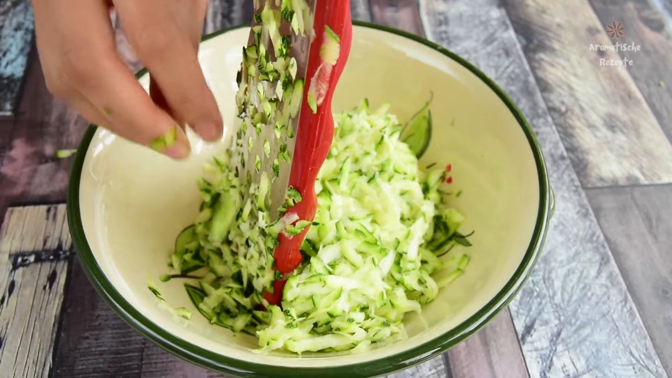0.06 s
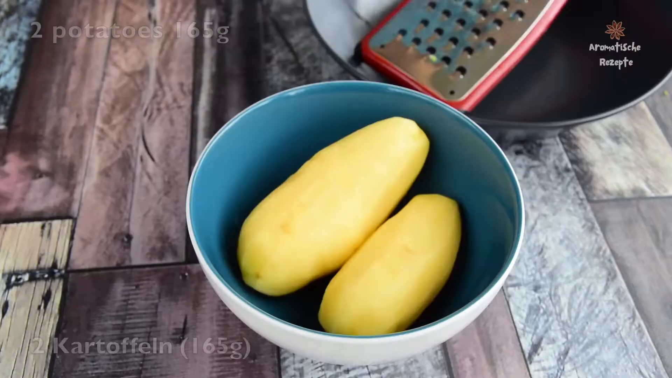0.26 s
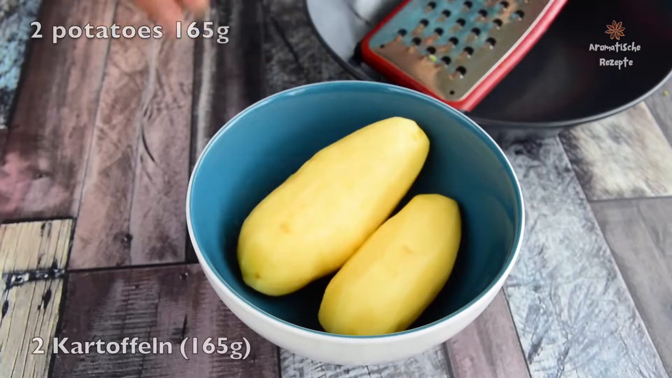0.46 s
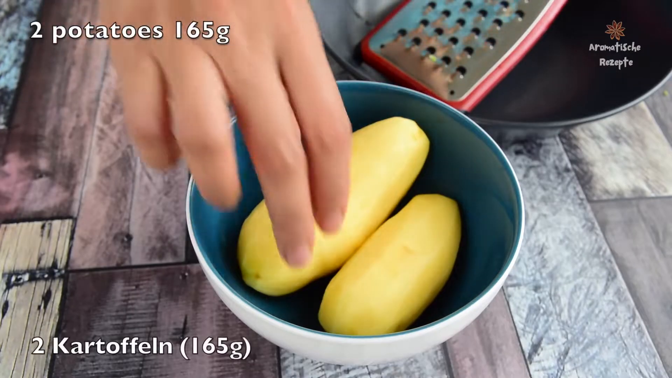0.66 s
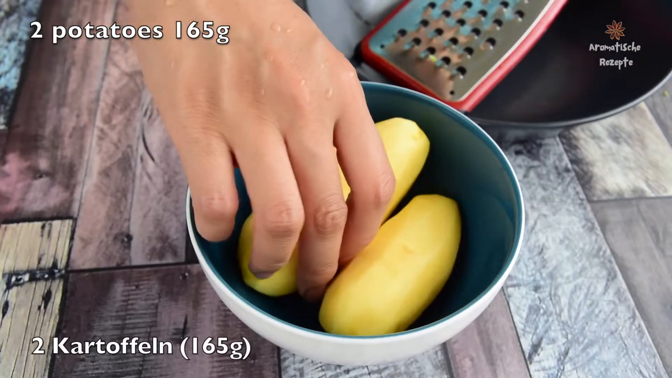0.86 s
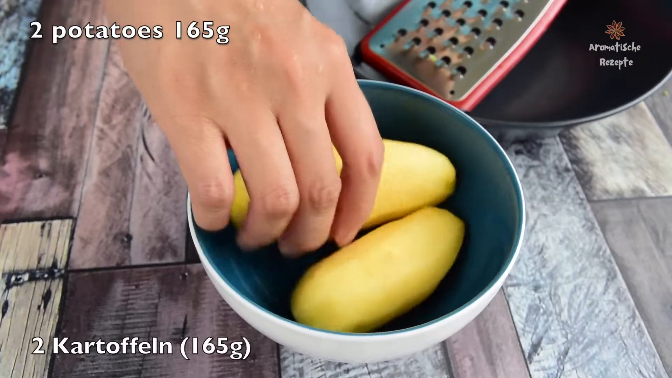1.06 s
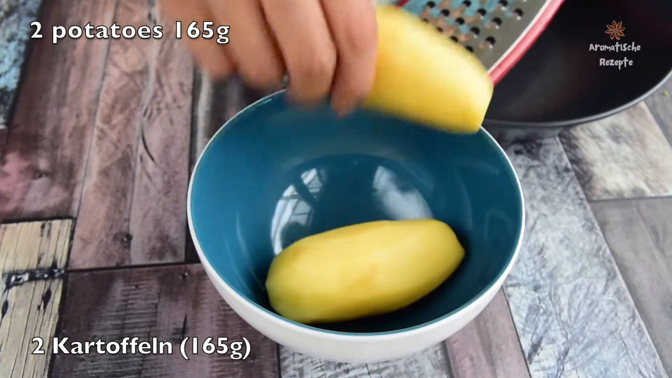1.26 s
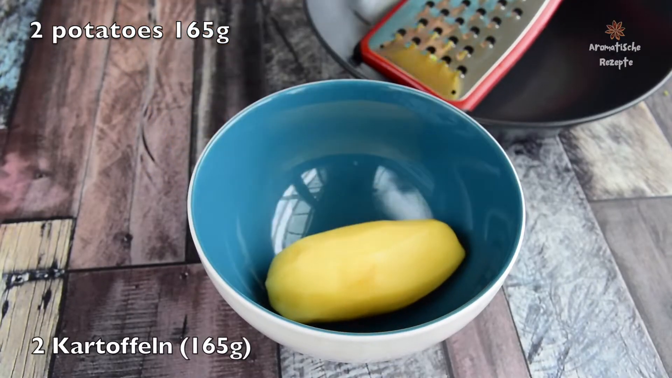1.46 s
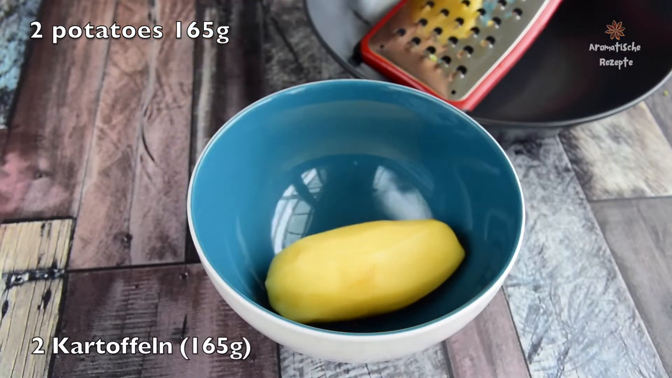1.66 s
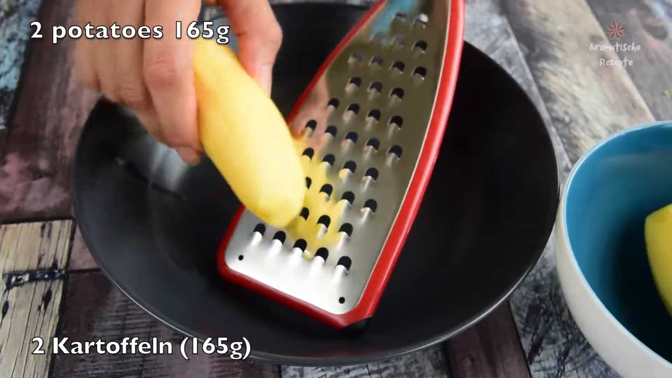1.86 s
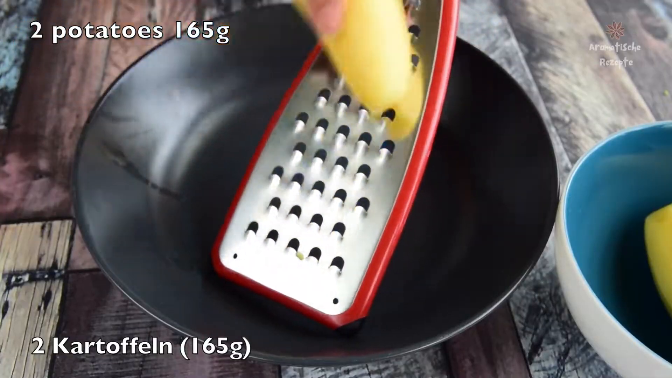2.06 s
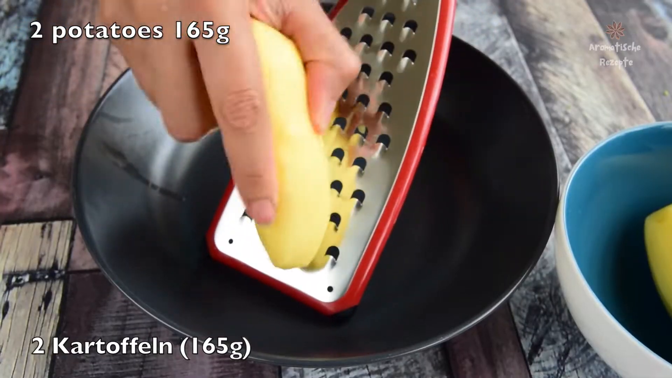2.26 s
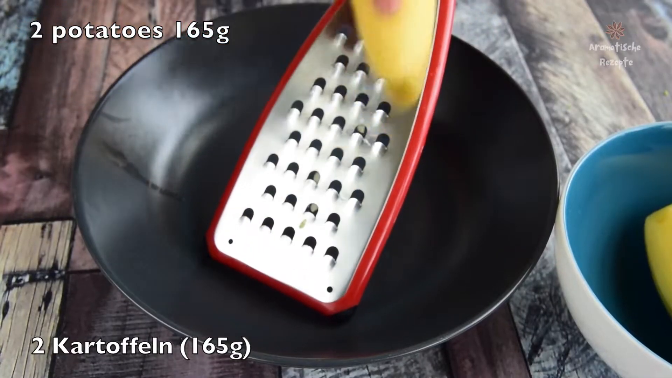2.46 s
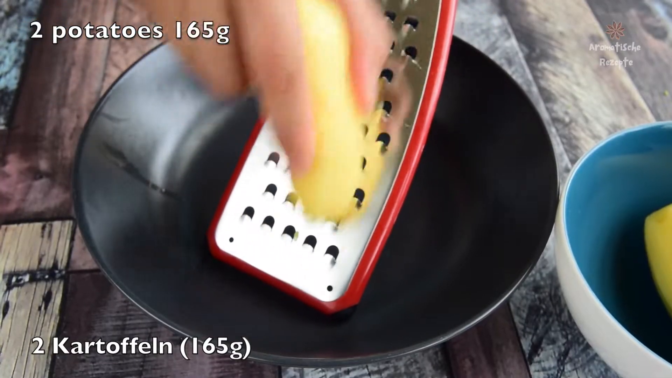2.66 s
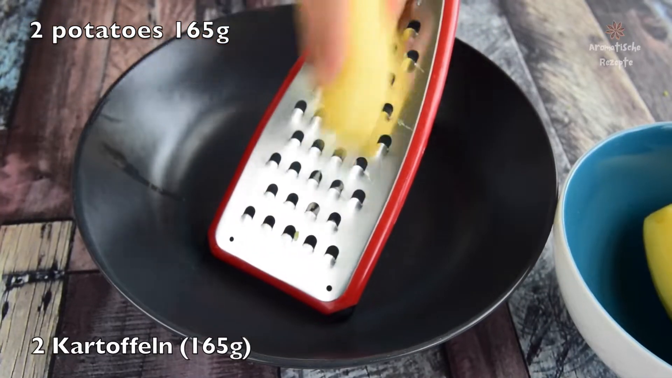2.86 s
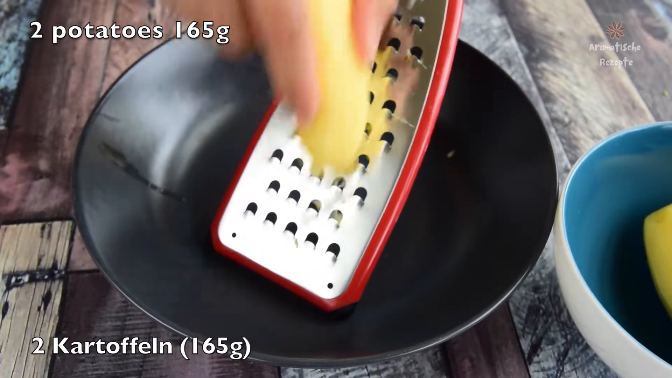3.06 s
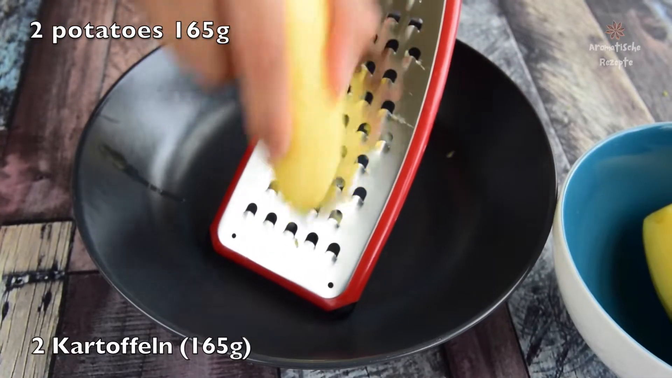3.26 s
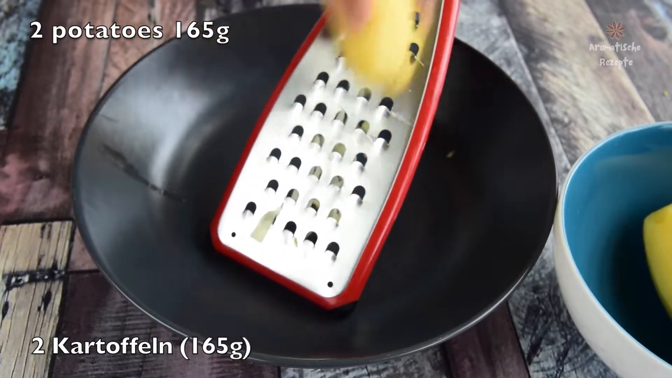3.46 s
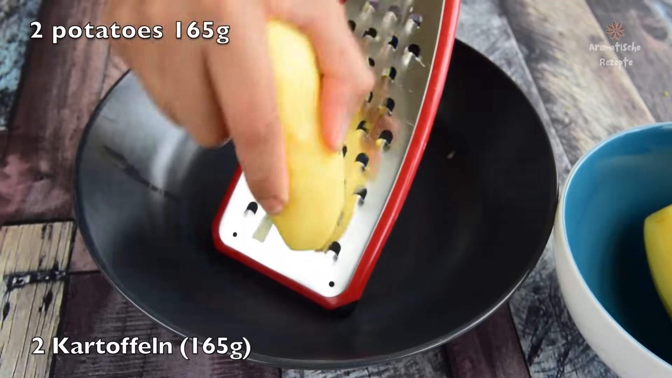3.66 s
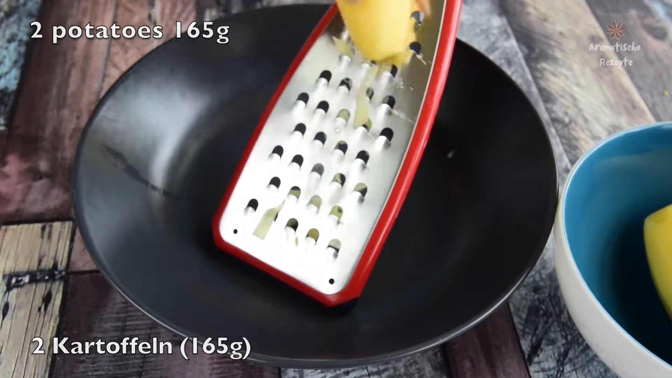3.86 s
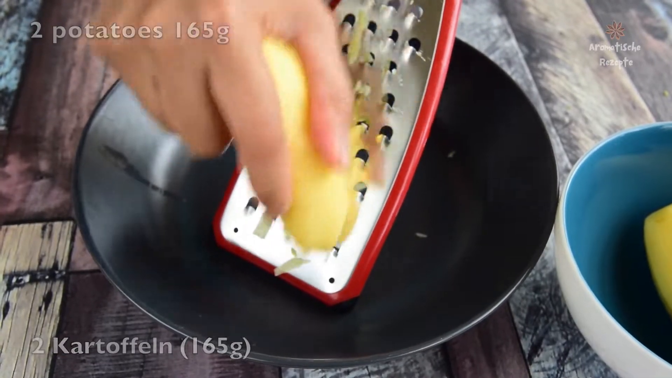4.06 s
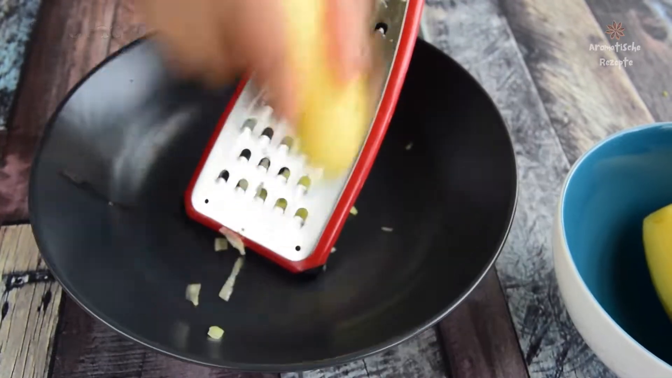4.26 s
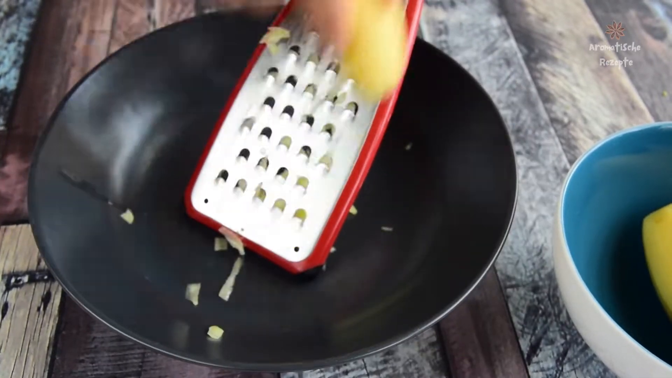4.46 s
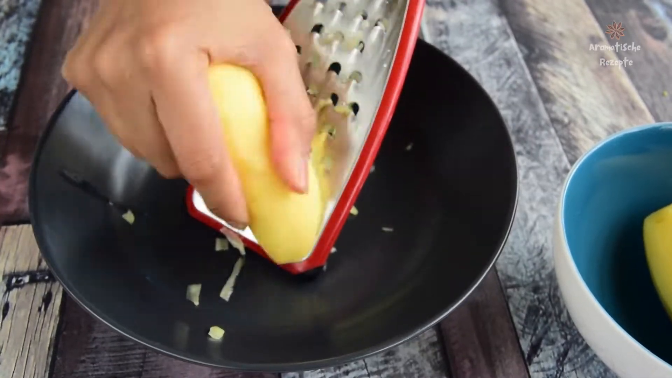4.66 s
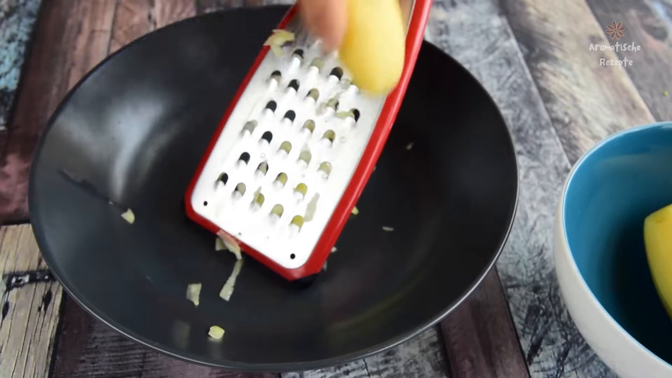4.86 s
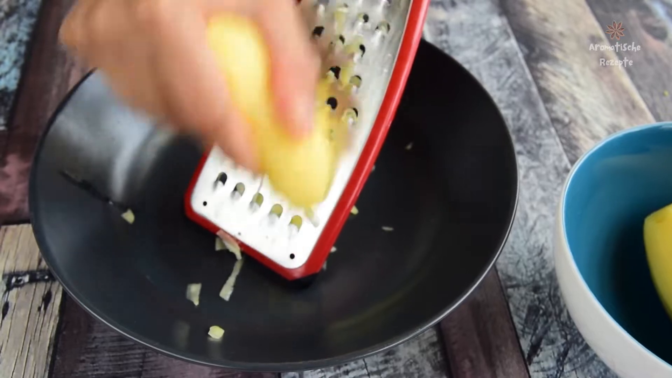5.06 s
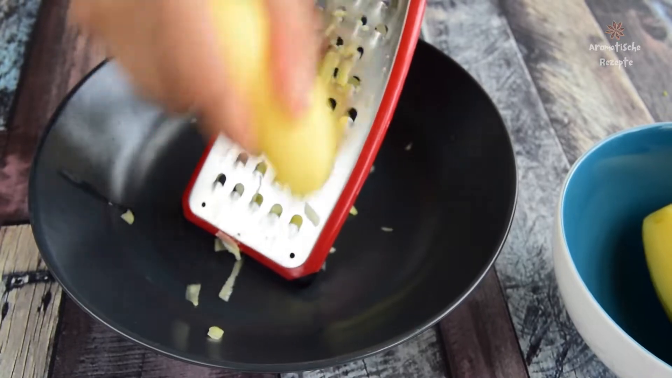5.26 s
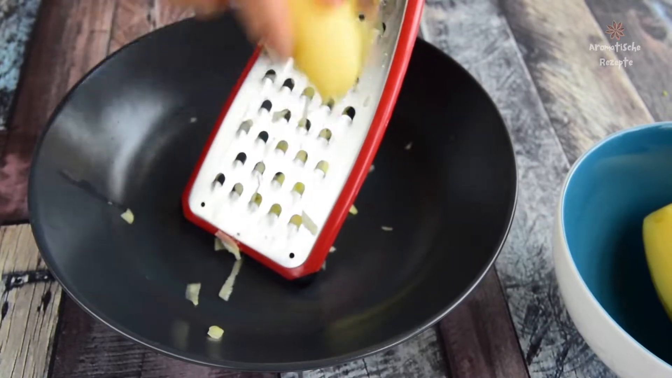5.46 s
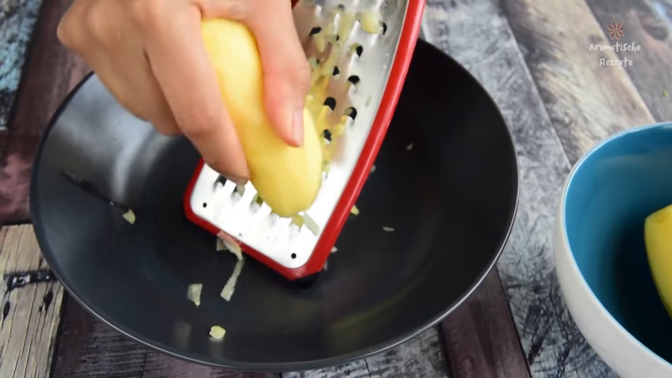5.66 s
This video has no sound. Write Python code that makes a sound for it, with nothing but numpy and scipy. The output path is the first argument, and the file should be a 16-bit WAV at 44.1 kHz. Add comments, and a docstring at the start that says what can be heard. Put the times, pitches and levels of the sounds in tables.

```python
"""Room air sinks away and swells back, then a potato bumps, rubs and squeaks in a ceramic bowl that clinks
on a plate. After a second fade it is rubbed over a flat steel grater, about three pushes a second.
Pushes tear the flesh and pulls skid back: showers of tiny ruptures drive tooth and sheet resonances.
Struck frame, crockery and table are decaying sines; shaped noise makes the sway, the walls and the air."""
import sys
import numpy as np
from scipy import signal
from scipy.fft import rfft, irfft
from scipy.io import wavfile
from scipy.ndimage import map_coordinates

SR = 44100
rng = np.random.default_rng(int(sys.argv[2]) if len(sys.argv) > 2 else 0)


def to_wav(s):
    """Save 16-bit WAV."""
    ch = np.atleast_2d(s).T  # columns
    pcm = np.round(np.clip(ch, -1, 1) * 32767)  # PCM
    wavfile.write(sys.argv[1], SR, pcm.astype(np.int16))


N = 251811
T = np.arange(N) / SR  # time in seconds

# Levels in the tables are relative: the mix and the fader scale them further.
# cutting strokes: start_s, length_s, level_db
PUSH_STROKES = [(2.088, 0.19, -29), (2.44, 0.18, -24.5), (2.802, .173, -22.5), (3.158, 0.17, -24),
                (3.497, 0.18, -22), (3.864, 0.16, -19.5), (4.204, .14, -20), (4.5, .17, -20.5),
                (4.843, 0.17, -21.5), (5.17, 0.15, -20.5), (5.489, .158, -21.5)]
# return strokes: start_s, length_s, level_db
PULL_STROKES = [(1.97, 0.14, -50.5), (2.25, 0.19, -36.5), (2.59, 0.19, -33), (2.97, 0.19, -32.5),
                (3.325, 0.18, -31), (3.676, 0.19, -31.5), (4.016, 0.19, -29), (4.35, 0.15, -29.5),
                (4.66, 0.084, -34.5), (4.985, 0.11, -36.5), (5.322, 0.17, -32), (5.675, 0.053, -33.5)]
# the potato catches on a tooth and jolts the grater: time_s, sheet_ring_db, frame_knock_db
TOOTH_CATCHES = [(1.991, -37, -55), (2.016, -36, -53), (2.064, -40.5, -63), (2.316, -26, -34),
                 (2.4, -22.5, -55), (2.713, -40, -31.5), (2.747, -22.5, -29.5), (3.07, -22.5, -46),
                 (3.106, -19, -42), (3.419, -28, -30), (3.458, -16.5, -43), (3.727, -21.5, -28.5),
                 (3.826, -20.5, -49), (4.379, -24, -34), (5.1, -31, -65)]
# the bowl bumps the table: time_s, level_db
BOWL_THUMPS = [(0.965, -26), (1.371, -41)]
# resonances of the steel sheet, damped by the potato: pitch_hz, width_hz, level_db
SHEET_MODES = [(800, 30, -15), (1220, 58, -10), (1567, 68, -3), (2213, 94, -8.5), (2605, 173, -2.5),
               (3195, 22, -12), (3478, 370, 1), (4270, 37, 4), (4600, 620, -4), (5800, 300, -9),
               (8090, 390, 0), (9880, 380, -1.5), (11950, 520, -2.5)]
# plastic frame on the plate: pitch_hz, level_db, t60_s
FRAME_MODES = [(596, 7.5, 0.022), (758, 6.5, 0.047), (1340, 2.5, 0.094), (1643, 9, 0.03)]
# spectrum of skidding flesh: pitch_hz, level_db (per Hz)
SKID_COLOUR = [(400, -15.5), (1500, 0.5), (3400, 7), (7000, 1.5), (10000, 3.5), (13000, -1), (16000, -31)]


def pushes(sheet_db=-4.0, flesh_db=-1.5, bite_db=-15.0, clog_db_per_s=0.54):
    """Cutting strokes: flesh crackles on the teeth and rings the sheet; a deep bite adds a lower crunch."""
    # spectra of tearing flesh and of the deep bite: pitch_hz, level_db (per Hz)
    tear_colour = [(400, -52), (1200, -33.5), (2300, -1), (3500, -3), (5500, -4), (7200, -4), (8200, -1.5),
                   (12000, -1.5), (14000, -8.5), (16000, -14)]
    bite_colour = [(150, -36), (280, 7.5), (430, -11), (650, 0), (1000, -1.5), (1400, 7.5), (2200, 5),
                   (5000, -16.5)]
    force = teeth(rate=400, spread_db=3, release_s=.004, steady=.55)
    tearing = crackle(force, rate=16000, spread_db=2.5)
    tearing = cutters(tearing, rate=85, patchy_db=4.7, width_hz=200)
    flesh = unit(through(tearing, colour(tear_colour)))
    crunch = unit(through(tearing, colour(bite_colour)))
    steel = damped_sheet(crackle(force, rate=7000, spread_db=8), rate=37, patchy_db=-0.5)
    steel = steel * undb(-clog_db_per_s * grated_s())  # shreds gather and damp the sheet
    mix = undb(flesh_db) * flesh + undb(sheet_db) * steel + undb(bite_db) * crunch
    return effort(PUSH_STROKES, skew=0.9, power=1.3) * mix  # pointed, peaking early


def pulls(sheet_db=-3, flesh_db=-3, frame_db=-17, rocking_db=6):
    """Return strokes: flesh skids over the backs of the teeth, the sheet rings patchily, the frame chatters."""
    force = teeth(rate=170, spread_db=3, release_s=.005, steady=.6)
    skidding = crackle(force, rate=8000, spread_db=3)
    skidding = cutters(skidding, rate=55, patchy_db=5, width_hz=170)
    flesh = unit(through(skidding, colour(SKID_COLOUR)))
    steel = damped_sheet(crackle(force, rate=4300, spread_db=4.5), rate=32, patchy_db=7.0)
    chatter = unit(through(crackle(force, rate=540, spread_db=-0.5), ring(FRAME_MODES)))
    chatter = chatter * undb(rocking_db * rocking())
    mix = undb(flesh_db) * flesh + undb(sheet_db) * steel + undb(frame_db) * chatter
    return effort(PULL_STROKES, skew=1.46, power=0.97) * mix  # round, peaking late


def catches(sheet_db=21.0, snap_db=15.0, frame_db=2):
    """A caught tooth tears free with a short rasp, and the frame knocks on the plate."""
    release = burst(t60=0.026) * np.minimum(T[:SR] / .004, 1)  # 4 ms attack
    rasp = through(blows([(s, db) for s, db, knock in TOOTH_CATCHES]), release)
    knocks = through(blows([(s, knock) for s, db, knock in TOOTH_CATCHES]), ring(FRAME_MODES))
    steel = undb(sheet_db) * through(rasp, sheet())
    snap = undb(snap_db) * through(rasp, colour(SKID_COLOUR))
    return steel + snap + undb(frame_db) * knocks


def singing(skew=1.5, power=1.3, patchy_db=4):
    """Barely damped by a light touch, the sheet rings on fitfully as grating begins."""
    # the potato first rests lightly: start_s, length_s, level_db
    light_touch = (2.03, .19, -40)
    # barely damped sheet: pitch_hz, level_db, t60_s
    free_modes = [(1640, -27, 0.18), (3160, -2, 0.035), (4890, 3, 0.041)]
    tone = through(crackle(1, rate=680, spread_db=2), ring(free_modes))
    tone = unit(tone * undb(patchy_db * wander(45)))
    return effort([light_touch], skew, power) * tone


def teeth(rate, spread_db, release_s, steady):
    """Force on the teeth: each one bites suddenly and lets go, over a steady drag."""
    force = through(snaps(rate, spread_db), np.exp(-T[:SR // 10] / release_s))
    return unit(np.sqrt(np.abs(force / force.mean() + steady)))


def crackle(force, rate, spread_db):
    """Cells of the flesh burst in showers, as hard as the teeth pull."""
    return unit(force * snaps(rate, spread_db) * rng.choice([-1, 1], N))


def snaps(rate, spread_db):
    """Tiny ruptures at random moments, of uneven size; rate is per second."""
    sizes = undb(spread_db * np.clip(rng.standard_normal(N), -2, 2))
    return (rng.random(N) < rate / SR) * sizes


def cutters(x, rate, patchy_db, width_hz, count=44):
    """Every tooth has its own pitch, and its level wanders as it works in the flesh."""
    pitches = np.linspace(np.sqrt(450), np.sqrt(15800), count) ** 2
    pitches = pitches * rng.uniform(.98, 1.02, count)
    widths = width_hz * np.sqrt(pitches / pitches.mean())  # higher ones die sooner
    total = np.zeros(N)
    for k, hz in enumerate(pitches):
        total += (-1) ** k * undb(patchy_db * wander(rate)) * resonate(x, hz, widths[k])
    return unit(total)


def damped_sheet(x, rate, patchy_db, drift_s=.003):
    """The travelling potato covers and frees each mode of the sheet in turn, and its load detunes them."""
    modes = np.zeros(N)
    for hz, width, db in SHEET_MODES:
        modes += undb(db + patchy_db * wander(rate)) * resonate(x, hz, width)
    drifting_s = T + drift_s * wander(5)  # a moving delay bends the pitch
    return unit(map_coordinates(modes, [drifting_s * SR], order=3))


def sheet():
    """Response of the steel sheet, unit energy; wide resonances die soonest."""
    t = T[:SR // 10]
    response = np.zeros(len(t))
    for hz, width, db in SHEET_MODES:
        response += undb(db) * width * np.cos(2 * np.pi * hz * t) * np.exp(-np.pi * width * t)
    return response / np.linalg.norm(response)


def stroke(start, length, skew, power):
    """One arch of the hand's speed, up and back to a stop; skew over 1 peaks late, high power is pointed."""
    along = np.clip((T - start) / length, 0, 1)
    return np.abs(np.sin(np.pi * along ** skew)) ** power


def effort(rows, skew, power):
    """Strength over time of a series of (start_s, length_s, level_db) strokes."""
    return sum(undb(db) * stroke(start, length, skew, power) for start, length, db in rows)


def grated_s(begin_s=2.36):
    """Time spent grating so far."""
    return np.maximum(T - begin_s, 0)


def rocking(wear_s=0.57):
    """How much the potato rocks on the teeth: 1 while round, decaying towards 0 as it wears flat."""
    return np.exp(-grated_s() / wear_s)


def bowl(rub_db=-2, tap_db=-33, crack_db=8, clink_db=4):
    """The potato taps and rubs the bowl; let go, the bowl clinks against the plate."""
    # the potato slides along the bowl: time_s, level_db
    slide = [(0.72, -83), (0.83, -59), (0.92, -80), (1.0, -63), (1.1, -68.5), (1.27, -63.5), (1.35, -71)]
    # the bowl knocks against the plate: time_s, level_db
    clinks = [(1.3703, -15.5), (1.3738, -29.5)]
    # bowl under the fingers, then dull tap of the potato in it: pitch_hz, level_db, t60_s
    bowl_modes = [(1092, 0.5, 0.24), (2810, 2, 0.078)]
    tap_modes = [(268, 9.5, 0.0083), (1160, -2, .09), (1690, 6.5, 0.047)]
    # bowl and plate together, with a close pair that beats: pitch_hz, level_db, t60_s
    crockery_modes = [(400, -17.5, 0.072), (740, -1, 0.085), (907, -3, 0.088), (1174, -21.5, 0.27),
                      (1297, -3.5, 0.14), (1596, -1, 0.05), (2053, 1, 0.07), (2016, -28.5, 0.7),
                      (2190, -8.5, 0.041), (2410, -2, 0.11), (2842, 2.5, 0.06), (2835, -9, .27),
                      (2850, -9, .27), (2845, -14, 0.04), (3340, -22, .04), (3730, -20.5, 0.079),
                      (3830, -7.5, 0.081), (3770, -30.5, 0.53), (5000, -29, 0.19), (6330, -26.5, 0.099)]
    rub = curve(slide) * unit(through(rng.standard_normal(N), ring(bowl_modes)))
    tap = through(blows([(BOWL_THUMPS[0][0], tap_db)]), ring(tap_modes))
    contact = blows(clinks)
    clink = through(contact, ring(crockery_modes))
    crack_colour = colour([(150, -33), (800, 2.5), (2600, -5), (4500, -14.0), (8000, -29.5), (15000, -42)])
    crack = through(through(contact, burst(t60=0.043)), crack_colour)
    return undb(rub_db) * rub + tap + undb(clink_db) * clink + undb(crack_db) * crack


def squeak(start_hz=1100, end_hz=1550, rough=0.23):
    """The wet potato slips on the glaze with a faint, rough, rising squeak."""
    hz = np.interp(T, [1.0, 1.05], [start_hz, end_hz]) * (1 + rough * wander(900))
    level = curve([(0.99, -60), (1.025, -54.5), (1.055, -62.5)])
    return level * np.sin(2 * np.pi * np.cumsum(hz) / SR)


def table(shake_db=1, sway_db=-7, jolt_db=9):
    """The table top booms under blows and jolts; it rumbles and sways under the juddering grater."""
    # table top: pitch_hz, level_db, t60_s
    table_modes = [(65.5, -7.5, 1), (98, 2.5, 0.076), (132, 0, 0.17), (177.8, -5, 0.19), (298.7, -9, 0.052)]
    top, shaking = ring(table_modes), shake()
    judder = through(shaking * crackle(1, rate=540, spread_db=4), top / np.linalg.norm(top))
    sway_colour = colour([(15, 18), (60, 11), (170, -17), (260, -36), (900, -26)])
    sway = shaking * through(rng.standard_normal(N), sway_colour)
    knocks = blows([(s, knock) for s, db, knock in TOOTH_CATCHES])
    jolts = undb(jolt_db) * rocking() * knocks
    booms = through(blows(BOWL_THUMPS) + jolts, top)
    return undb(shake_db) * judder + undb(sway_db) * sway + booms


def shake(push_db=-19, pull_db=-15, rocking_db=12.5, lean_db_per_s=0.3, settle_s=0.0051):
    """Every stroke shakes the table: pushes more as the hand leans harder, pulls most while the potato rocks."""
    shape = dict(skew=1.0, power=0.97)
    pushing = undb(push_db + lean_db_per_s * grated_s()) * effort(PUSH_STROKES, **shape)
    pulling = undb(pull_db + rocking_db * rocking()) * effort(PULL_STROKES, **shape)
    settling = np.exp(-T[:SR // 2] / settle_s)
    return through(pushing + pulling, settling / settling.sum())


def kitchen(x, wet_db=-17, t60=0.54, gap_s=0.008):
    """Walls return a soft, duller tail after a short gap."""
    tail = burst(t60) * np.clip(T[:SR] / gap_s - 1, 0, 1)
    walls = colour([(100, 16.0), (3000, 2.5), (7000, 5.0), (15000, -17.0)])
    return x + undb(wet_db) * through(through(x, tail), walls)


def air(air_db=-55):
    """Steady rumble and fainter hiss from shaped noise, with a small difference between the channels."""
    # spectrum of the room air: pitch_hz, level_db (per Hz)
    air_colour = [(15, -37), (25, -11.5), (64, 1), (82, -4.5), (96, -7), (173, -10.5), (552, -16.5),
                  (614, -17), (741, -17), (1660, -21), (2120, -22.5), (15500, -25.5)]
    # difference between the channels relative to their sum: pitch_hz, level_db
    air_width = [(60, -26.5), (500, -16.5), (2000, -27.5), (8000, -18.5)]
    hz, width_db = np.transpose(air_width)
    mid, side = (through(rng.standard_normal(N), colour(air_colour)) for _ in range(2))
    width = undb(np.interp(np.arange(N // 2 + 1) * SR / N, hz, width_db))
    side = irfft(rfft(side) * width, N)
    return undb(air_db) * np.array([mid + side, mid - side])


def fader(opening_db=5.5, faded_db=-30.5, cut_s=.016, fade_power=4.65):
    """The volume drops almost at once, then swells back, slowly at first, over a constant low floor."""
    # volume fades: cut_start_s, fully_back_s, level_afterwards_db (before the floor is added)
    fades = [(0.204, 0.7, 6), (1.764, 1.983, 0)]
    gain = undb(opening_db)
    for cut, back, db in fades:
        closing = np.clip(1 - (T - cut) / cut_s, 0, 1) ** 2
        opening = np.clip((T - cut) / (back - cut), 0, 1) ** fade_power
        gain = gain * closing + undb(db) * opening
    return gain + undb(faded_db)


def undb(db):
    """Decibels to gain."""
    return 10 ** (np.asarray(db) / 20)


def unit(x):
    """Scale to rms 1."""
    return x / np.sqrt(np.mean(x ** 2))


def curve(rows):
    """Gain over time from (time_s, level_db) rows, closing within a few ms outside them."""
    s, db = np.transpose(rows)
    outside = np.maximum(np.maximum(s[0] - T, T - s[-1]), 0)
    return undb(np.interp(T, s, db)) * np.exp(-outside / 0.0025)


def wander(rate):
    """Random motion in straight glides, with the given turns a second; spread near 1."""
    count = int(N / SR * rate) + 2
    return np.interp(T * rate, np.arange(count), np.clip(rng.standard_normal(count), -2, 2))


def through(x, response):
    """Pass a sound through an impulse response."""
    return signal.fftconvolve(x, response)[:N]


def colour(points, size=4096):
    """Causal minimum-phase response with the given (pitch_hz, level_db) spectrum shape and unit energy."""
    hz, db = np.transpose(points)
    bins = np.maximum(np.arange(size // 2 + 1) * SR / size, 1)
    cepstrum = irfft(np.log(undb(np.interp(np.log(bins), np.log(hz), db))))
    cepstrum[1:size // 2] *= 2  # fold the cepstrum to make it causal
    cepstrum[size // 2 + 1:] = 0
    response = irfft(np.exp(rfft(cepstrum)))
    return response / np.linalg.norm(response)


def resonate(x, hz, width):
    """One resonance with gain 1 at its centre."""
    return signal.lfilter(*signal.iirpeak(min(hz, .45 * SR), hz / width, fs=SR), x)


def ring(modes):
    """Decaying sines of a struck body, peak 1; t60 is the time to fall 60 dB."""
    t = T[:SR]
    response = np.zeros(SR)
    for k, (hz, db, t60) in enumerate(modes):
        decay = np.exp(-np.log(1000) * t / t60)
        response += (-1) ** k * undb(db) * np.sin(2 * np.pi * hz * t) * decay
    return response / np.abs(response).max()


def burst(t60):
    """A dying puff of noise, unit energy."""
    response = rng.standard_normal(SR) * np.exp(-np.log(1000) * T[:SR] / t60)
    return response / np.linalg.norm(response)


def blows(rows):
    """One impulse for each (time_s, level_db) row."""
    x = np.zeros(N)
    for s, db in rows:
        x[int(s * SR)] += undb(db)
    return x


def scene():
    """Bowl, grater and table sound from the centre, inside the air of the room."""
    grating = pushes() + pulls() + catches() + singing()
    return kitchen(grating + bowl() + squeak() + table()) + air()


def record(dry, top_hz=16000):
    """The fader dips twice and a steep low-pass cuts the top."""
    low_pass = signal.ellip(10, .2, 80, top_hz, fs=SR, output="sos")
    return signal.sosfilt(low_pass, dry * fader())


dry = scene()
out = record(dry)
to_wav(out)
```